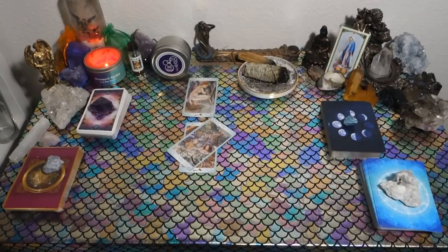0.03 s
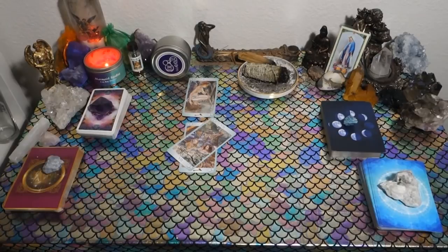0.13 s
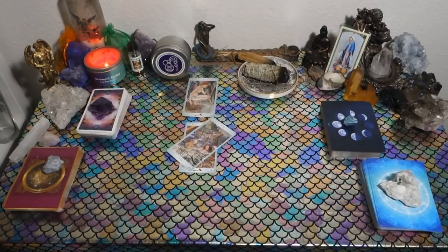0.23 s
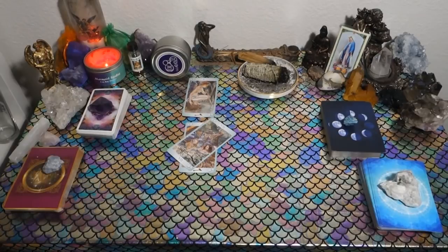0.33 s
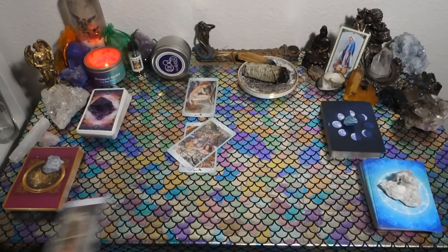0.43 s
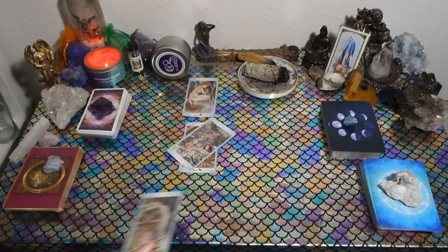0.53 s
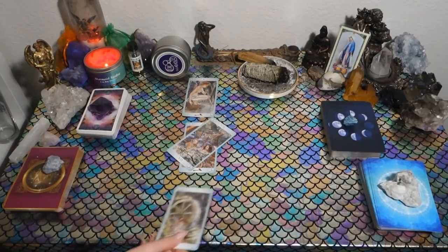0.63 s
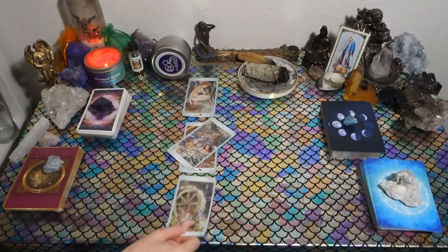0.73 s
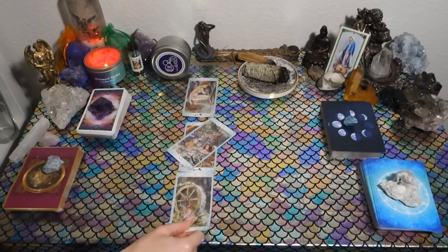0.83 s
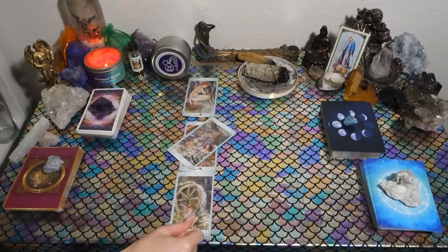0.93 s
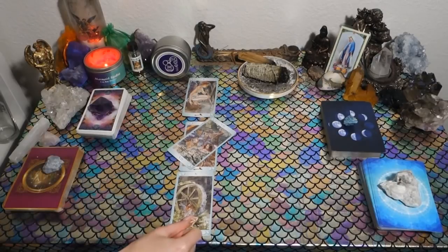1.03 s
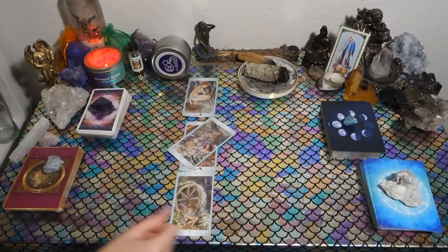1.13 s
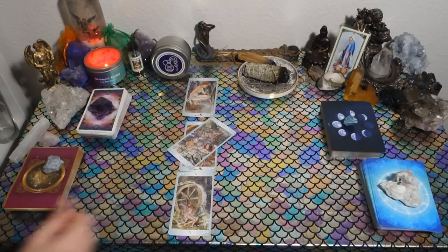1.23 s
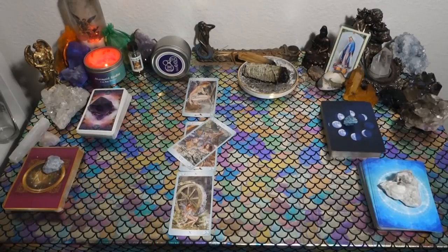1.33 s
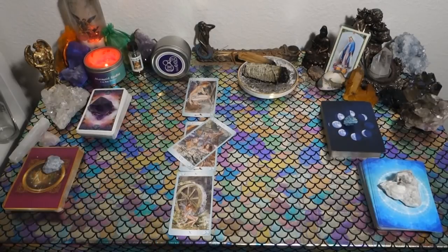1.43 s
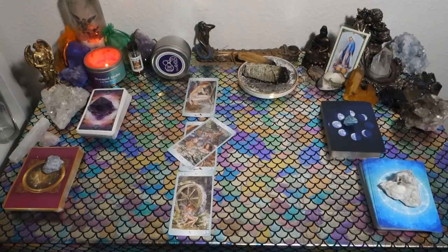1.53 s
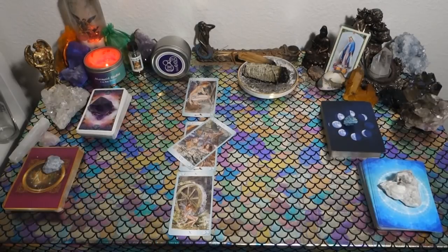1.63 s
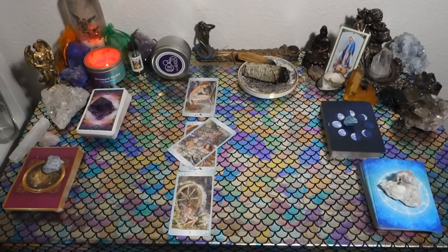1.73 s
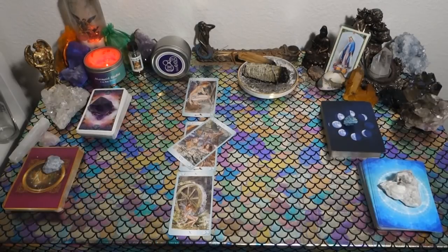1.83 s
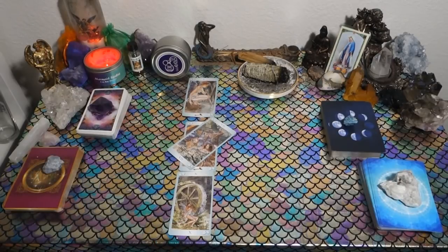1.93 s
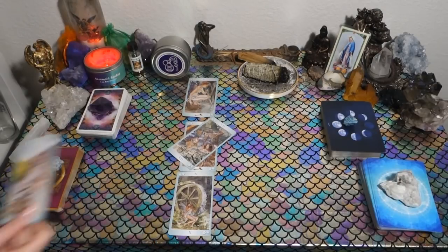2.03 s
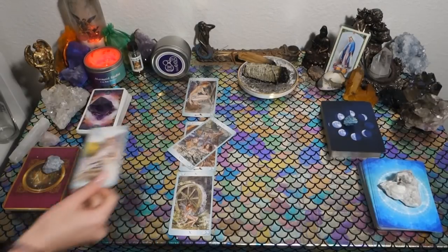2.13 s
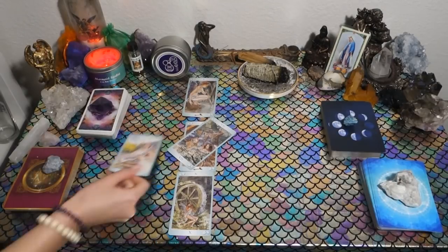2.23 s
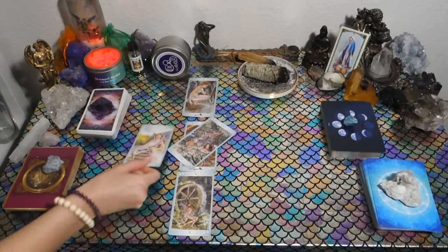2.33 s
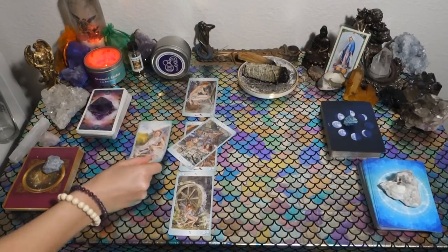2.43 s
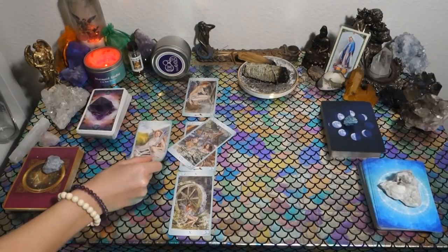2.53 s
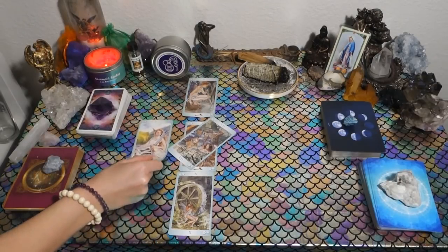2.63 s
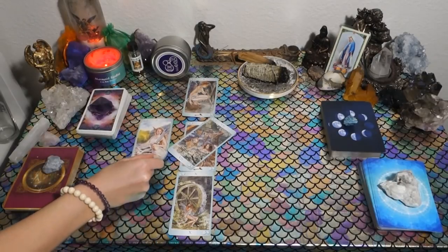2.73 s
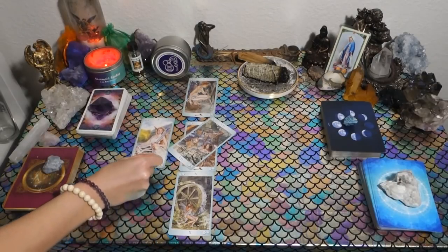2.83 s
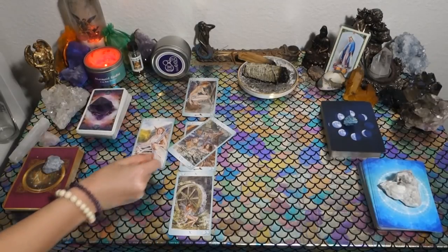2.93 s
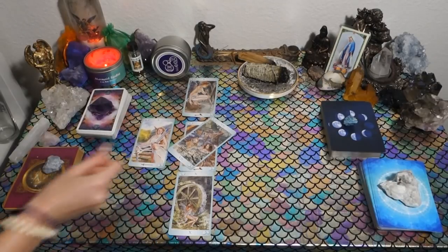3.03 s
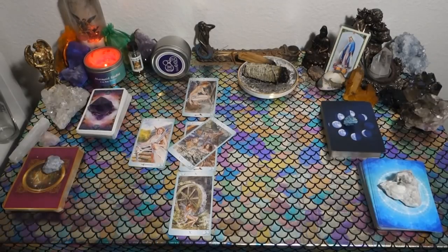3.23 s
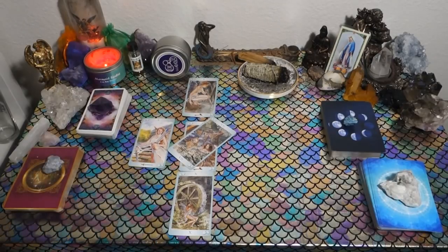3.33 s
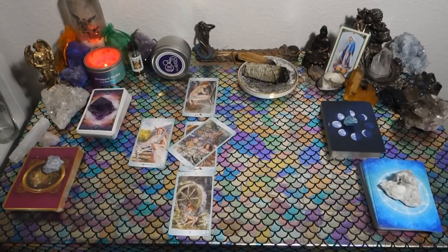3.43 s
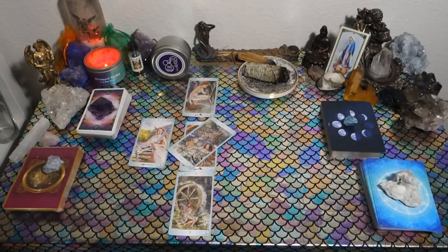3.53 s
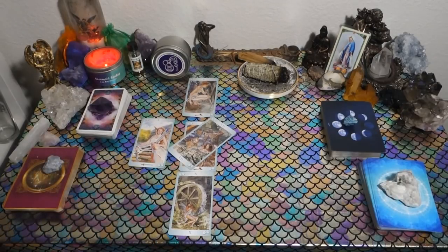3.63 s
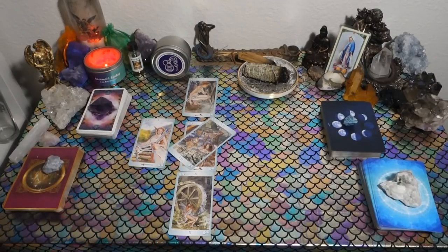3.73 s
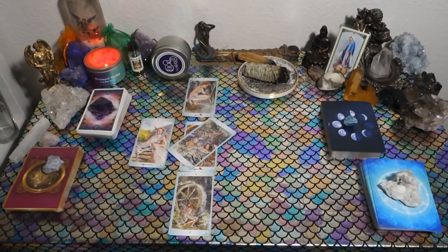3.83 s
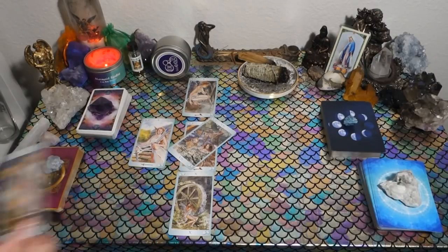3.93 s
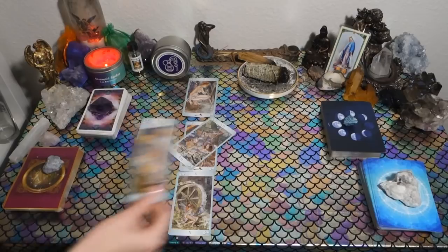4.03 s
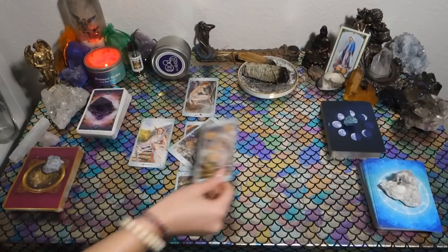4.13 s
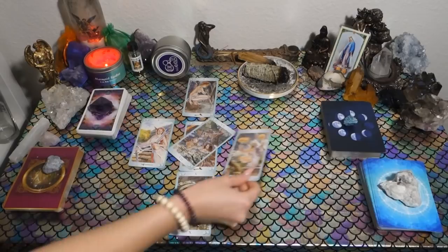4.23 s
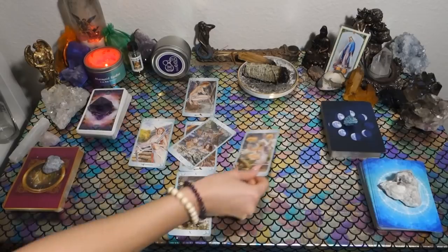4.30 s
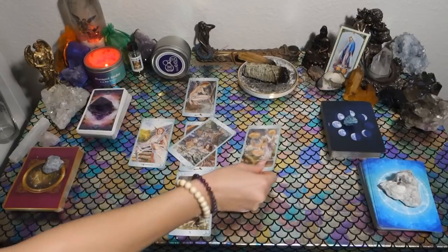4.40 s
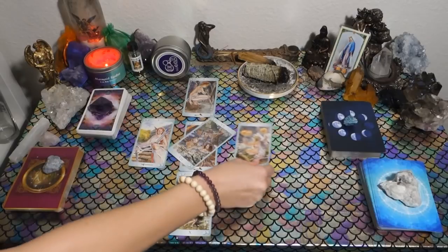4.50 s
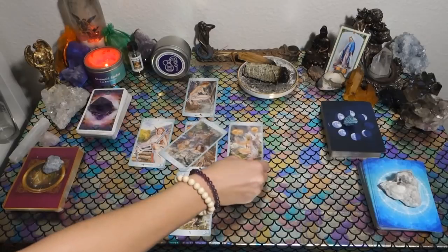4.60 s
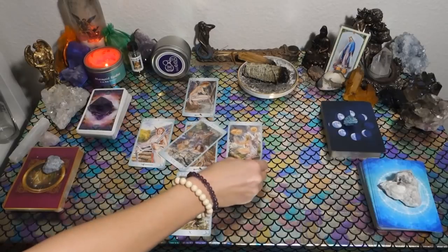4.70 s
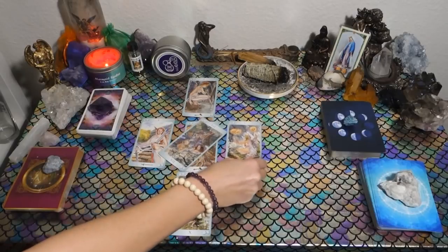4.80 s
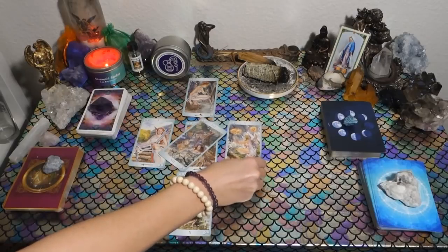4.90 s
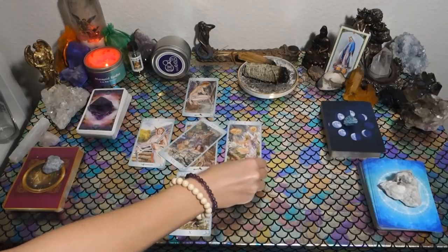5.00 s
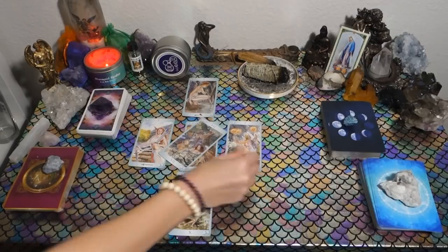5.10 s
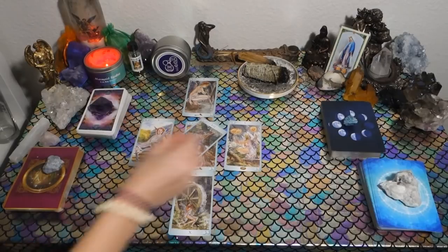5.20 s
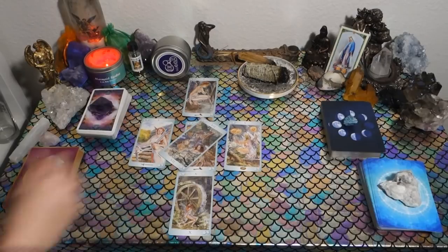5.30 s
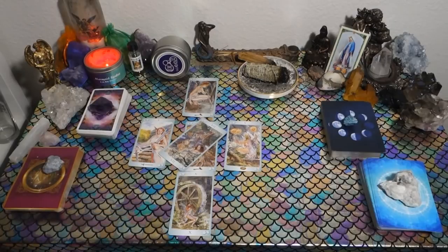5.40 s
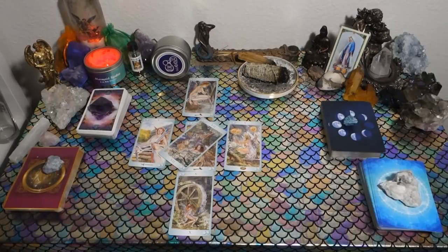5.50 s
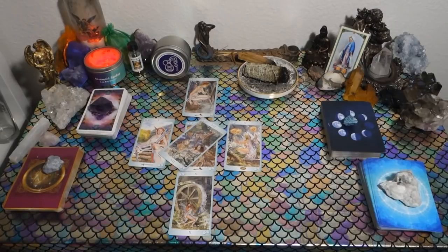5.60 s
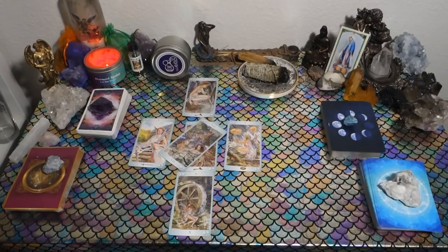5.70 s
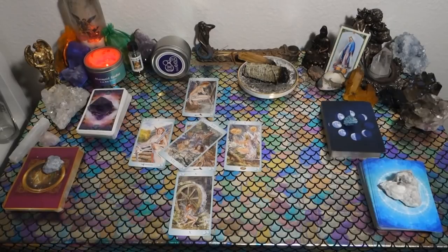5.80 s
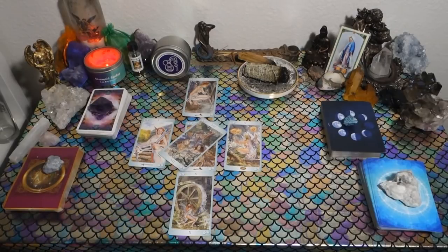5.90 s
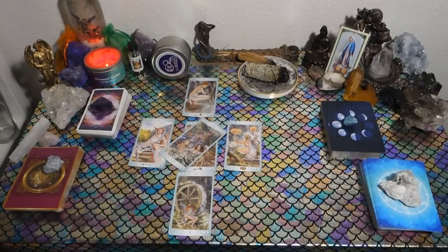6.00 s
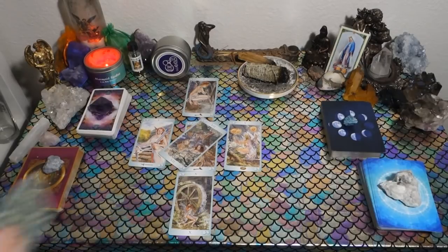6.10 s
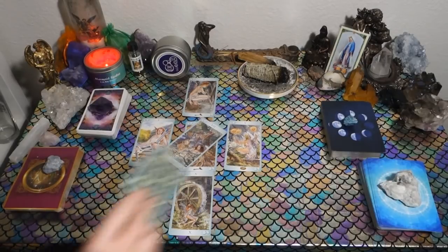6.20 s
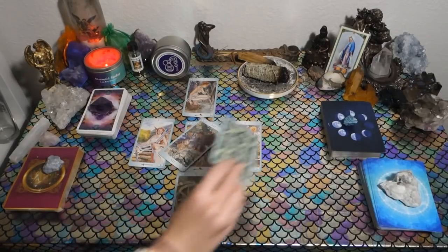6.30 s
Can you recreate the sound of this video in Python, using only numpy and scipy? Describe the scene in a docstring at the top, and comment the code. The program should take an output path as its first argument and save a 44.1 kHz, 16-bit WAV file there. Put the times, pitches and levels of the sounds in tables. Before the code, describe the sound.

A small quiet room, a stereo microphone near a cloth-covered table, with a steady low airy noise underneath. At about 0.3 s a card hisses off the deck in the hand, its edge ticking at 0.4 s; faint rubs follow, then a tiny scrape and the loudest snap at 1.0 s, with a short low thump. A faint woody thumb tap comes at 1.5 s. The second card slides out around 1.9 s, ticks and rubs between 2.3 and 2.6 s, and cracks down brightly at 2.85 s. Soft deck taps sit at 3.4 and 3.55 s. The third is drawn at 3.85 s, flicks strongly at 4.1 s, rubs near 4.5 s and slaps down at 5.0 s, a little softer and more roomy. After a light tap at 5.6 s, a fourth card slides out at 6.0 s with small flicks until about 6.3 s, without landing. Early echoes and a short tail follow each contact.

```python
"""A small room, a stereo microphone near a cloth-covered table: stiff cards are dealt from a deck in the hand.
First a low airy room noise, which lies under it all; then each card slides off the deck with a hiss of tiny
slips, its edge ticks as ringing contacts, its corner scrapes off the thumb and it snaps flat on the table.
The thumb taps the deck between cards, ringing short woody modes. Three cards are laid and a fourth is drawn.
Table and walls return a few early echoes, then a short tail of decaying noise."""
import sys
import numpy as np
from scipy import signal
from scipy.io import wavfile
from scipy.ndimage import uniform_filter1d

SR = 44100
rng = np.random.default_rng(int(sys.argv[2]) if len(sys.argv) > 2 else 0)


def bounce(signal):
    """Save signal as a 16-bit WAV file at the path given by the first command-line argument."""
    frames = np.transpose(np.atleast_2d(signal))
    limited = np.clip(frames, -1, 1)
    pcm = np.round(limited * 32767).astype(np.int16)
    wavfile.write(sys.argv[1], SR, pcm)


def how_loud(loudness_db):
    """Turn decibels into a plain amplitude multiplier (0 dB gives 1, 20 dB gives 10)."""
    steps = np.asarray(loudness_db, float) / 20
    return 10 ** steps


N = 280035


def rms_one(x):
    """Scale to unit rms."""
    return x / np.sqrt(np.mean(x ** 2) + 1e-20)


def at_hz(points, hz):
    """Read a table on a log-frequency axis."""
    table_hz, values = np.transpose(points)
    return np.interp(np.log(hz), np.log(table_hz), values)


def cut(x, hz, kind):
    """Second-order Butterworth filter."""
    return signal.sosfilt(signal.butter(2, hz, kind, fs=SR, output="sos"), x)


def resonance(hz, width_hz):
    """Coefficients of a resonance with gain 1 on top."""
    r = np.exp(-np.pi * width_hz / SR)
    return (1 - r * r) / 2 * np.array([1, 0, -1]), [1, -2 * r * np.cos(2 * np.pi * hz / SR), r * r]


def card_resonance(hz, width):
    """A card's resonance; its width is relative to the pitch and held between 0.2 and 3."""
    return resonance(hz, np.clip(width, 0.2, 3) * hz)


def twice(x, hz, width):
    """The card resonance passed twice, for steep flanks."""
    shape = card_resonance(hz, width)
    return signal.lfilter(*shape, signal.lfilter(*shape, x))


def ring(at, heights, modes):
    """Clicks at given samples strike every decaying mode; one row of heights per mode."""
    out = np.zeros(N)
    for (hz, db, t60), height in zip(modes, heights):
        train = np.full(N, 1e-18)      # a trace of offset keeps the filter out of denormals
        np.add.at(train, at, height * how_loud(db))
        r = how_loud(-60 / (t60 * SR))
        w = 2 * np.pi * hz / SR
        out += signal.lfilter([0, np.sin(w)], [1, -2 * r * np.cos(w), r * r], train)
    return out


def spread(mid, side, alike):
    """Left and right from two independent noises, with a given left-right likeness."""
    return np.sqrt(1 + alike) * mid + np.sqrt(1 - alike) * side * [[1], [-1]]


def stereo_bands(size, likeness):
    """Half-octave bands of stereo noise, as (centre Hz, band)."""
    edges = 25 * 2 ** np.arange(0, 9.7, 1 / 2)
    white = rng.standard_normal((2, 2, size))
    for k, (low, high) in enumerate(zip(edges, edges[1:])):
        # neighbouring bands take turns at two independent noises
        mid, side = cut(white[k % 2], [low, high], "band")
        hz = np.sqrt(low * high)
        yield hz, spread(mid, side, at_hz(likeness, hz))


# Card edges ticking and flicking close by, with the table's echo of the first tick as the second row.
# Each row: start in seconds, level in dB, card ring in Hz, room share in dB re level before a common gain,
# ring width relative to pitch.
EDGE_TICKS = [(0.409, -20.5, 1920, -8.5, 2.07), (0.417, -28, 3060, -17, 2.8),
              (0.5384, -35.5, 2410, -8, 2.1), (0.7206, -35, 1990, -9.5, 1.5),
              (0.7624, -39.5, 2450, -7, 1.1), (0.9178, -39, 5370, -12, 1.1), (1.8687, -24.5, 2820, -6, 3),
              (1.9284, -25.5, 1670, -11, 2.4), (2.2825, -25, 2040, -17, 0.52),
              (2.419, -21.5, 3040, -13.5, 1.8), (2.4232, -19, 2040, -12.5, 0.97),
              (2.5284, -36, 4500, -8, 2.2), (2.5477, -28, 4370, -10, 1), (2.558, -35, 5000, -12, 1.6),
              (3.8434, -30, 6750, 5.5, 1.2), (3.9478, -28, 1640, -10, 2.6), (4.0903, -31, 1600, -10, 2.5),
              (4.1122, -13, 1700, -13.5, 2.9), (4.113, -23, 2150, -10, 0.4), (4.1546, -31, 3380, -20, 2.3),
              (4.1685, -25, 3280, -12, 1.2), (4.2373, -33, 8950, -5, 0.96), (4.4208, -34.5, 2570, -9, 0.65),
              (4.5772, -23.5, 2700, -22, 0.36), (6.1682, -26.5, 2540, -10.5, 1.5),
              (6.2587, -26.5, 11000, -9, 1.2), (6.2988, -22, 2570, -11, 0.94)]
# A bent card snaps flat on the table, the later ones in two contacts. Each row: start in seconds, level in dB,
# card ring in Hz, crack in dB re ring peak, room share in dB re level before a common gain,
# ring width relative to pitch.
CARD_SLAPS = [(0.9976, 0, 2810, 7.5, -17.5, 2.7), (2.854, -3, 2040, 17, -21, 2),
              (2.8544, -3.5, 2190, 3.5, -7.5, 3.3), (4.9937, -8.5, 5260, -15, -22, 1.5),
              (4.996, -4, 3840, 2, -1.5, 1.68)]


def card_contacts():
    """A sharp, slightly rough contact rings the card and cracks on top; gives direct sound and room feed."""
    direct, feed = np.zeros(N), np.zeros(N)
    ms = np.arange(300) * 1000 / SR
    sharp = 1.0 * (ms == 0)
    # the crack of a tick lies 28 dB below its ring
    ticks = [(s, db, hz, -28, room_db, width) for s, db, hz, room_db, width in EDGE_TICKS]
    for s, db, hz, crack_db, room_db, width in ticks + list(CARD_SLAPS):
        roughness = 0.4 * rng.standard_normal(len(ms)) * np.exp(-ms / 0.73)
        contact = np.array([sharp, sharp + roughness])
        body = twice(contact, hz, width)
        crack = cut(contact, 5800, "high")
        body = body / np.abs(body[0]).max()
        crack = crack / np.abs(crack[0]).max()
        smooth, rough = body + how_loud(crack_db) * crack
        at = round(s * SR)
        direct[at:at + len(ms)] += how_loud(db) * rough / np.abs(rough).max()
        feed[at:at + len(ms)] += how_loud(db + room_db) * smooth
    return direct, feed


# The cloth-covered table under the cards. Each row: mode in Hz, relative level in dB, t60 in seconds.
TABLE_MODES = [(93.5, -21, 0.12), (150, -2, 0.077), (216, -3.5, 0.073), (300, 5, 0.031), (408, -0.5, 0.025),
               (565.6, -3.5, 0.05), (716, -0.5, 0.017), (923, 5.5, 0.011), (1262, 7.5, 0.011),
               (1724, 4, 0.015)]


def push_table(s, db, thump_hz, focus_db):
    """A soft push rings the table; modes near the thump pitch answer most, neighbours in opposite sense."""
    octaves = np.log2(np.array(TABLE_MODES)[:, :1] / thump_hz)
    scatter_db = 2 * rng.standard_normal((len(s), len(TABLE_MODES))).T
    # focus_db is the loss of a mode one octave from the thump pitch
    heights = how_loud(db - focus_db * octaves ** 2 + scatter_db)
    heights = heights * (-1) ** np.arange(len(TABLE_MODES))[:, None]
    return cut(ring((s * SR).astype(int), heights, TABLE_MODES), 1660, "low")


# Knuckles and flat cards pushing softly into the table. Each row: start in seconds, level in dB, thump in Hz.
TABLE_BUMPS = [(0.34, -38.5, 420), (.726, -33, 505), (.745, -54, 536), (0.996, -22.5, 150),
               (0.997, -18, 510), (0.996, -23, 860), (0.996, -27, 1740), (1.932, -36, 560),
               (1.949, -40, 260), (2.319, -40, 150), (2.854, -31, 150), (2.854, -26.5, 487),
               (2.854, -24, 1130), (3.893, -38.5, 550), (4.995, -26, 328), (4.996, -21, 590),
               (4.995, -23.5, 1600)]


def table_thumps():
    """The table answers every row of ticks faintly, and the soft bumps with more focused pitches."""
    s, tick_db = np.array(EDGE_TICKS)[:, :2].T
    under_ticks = push_table(s, tick_db - 21, 905, focus_db=7.5)
    return under_ticks + push_table(*np.transpose(TABLE_BUMPS), focus_db=18)


# The corner scrapes off the thumb just before each slap. Each row: start in seconds, end in seconds,
# last level in dB, ring in Hz, rise in dB.
CORNER_SLIPS = [(0.988, 0.9968, -14, 4330, 30), (2.841, 2.851, -25, 2860, 20),
                (4.987, 4.9928, -31, 3200, 17)]


def corner_slips():
    """A scrape of resonant noise that swells until the card lets go."""
    out = np.zeros(N)
    for start, end, db, hz, rise_db in CORNER_SLIPS:
        first, last = round(start * SR), round(end * SR)
        scrape = twice(rng.standard_normal(1000), hz, 3)[:last - first]
        swell_db = db - rise_db * np.linspace(1, 0, last - first)
        out[first:last] = rms_one(scrape) * how_loud(swell_db)
    return out


# A card is drawn off the deck in the hand. Each row: card leaves in seconds, time at full speed in seconds,
# card ring in dB, hiss in dB, both before the common slide level.
CARD_DRAWS = [(0.322, 0.11, -37, -35.5), (1.907, 0.14, -36, -36), (3.867, 0.11, -34.5, -36.5),
              (6.046, 0.12, -37, -35)]
# The course of every draw, one row each at start, full speed, leaving and end. Each row: ring in dB re the
# draw's ring, ring in Hz, hiss in dB re the draw's hiss, rumble in dB re the draw's ring,
# ring width relative to pitch.
DRAW_COURSE = [(-26, 4300, -25, -36, 2.1), (-11, 1000, -2.5, -16.5, 3), (1, 2140, 2.5, -10.5, 3.5),
               (-38, 3500, -31, -23, 1.3)]
# A card rubs on fingers or cloth. Each row: peak in seconds, swell in seconds, fade in seconds,
# peak level in dB before the common slide level, card ring in Hz, hiss in dB re level.
CARD_RUBS = [(0.68, 0.04, 0.048, -52.5, 2800, 9), (0.78, 0.05, 0.14, -50, 2950, 6),
             (0.985, 0.096, 0.0064, -42, 3200, -1), (2.33, 0.044, 0.17, -41, 2100, 0.5),
             (2.488, 0.015, 0.015, -30, 4250, -12), (2.555, 0.019, 0.064, -42.5, 4500, 2),
             (4.14, 0.037, 0.099, -42.5, 2150, 5.5), (4.45, 0.04, 0.019, -42.5, 2680, 5),
             (4.56, 0.11, 0.051, -34, 2660, -3.5), (4.63, 0.04, 0.035, -45.5, 2550, 9.5),
             (6.263, 0.0085, 0.02, -46, 3300, 14), (6.31, 0.015, 0.051, -35, 2830, -3)]


def strokes():
    """Corner points of every slide: s, ring dB, ring Hz, hiss dB, rumble dB, ring width."""
    speed_up_s, die_away_s = 0.095, 0.039
    ring_db, hz, hiss_db, rumble_db, width = np.transpose(DRAW_COURSE)
    for s, hold, db, top_db in CARD_DRAWS:
        times = s + np.array([-hold - speed_up_s, -hold, 0, die_away_s])
        yield times, db + ring_db, hz, top_db + hiss_db, db + rumble_db, width
    same = np.ones(3)
    for s, swell, fade, db, card_hz, hiss_db in CARD_RUBS:
        times = s + np.array([-swell, 0, fade])
        level = db + np.array([-16.5, 0, -16.5])
        yield times, level, card_hz * same, level + hiss_db, level - 13, 0.72 * same


def card_slides():
    """Dense tiny slips ring the moving card resonance, hiss above it and rumble in the table."""
    time, out = np.arange(N) / SR, np.zeros(N)
    burst_db = 4.5 * np.minimum(rng.exponential(1, (3, N)), 5)
    grit = rng.standard_normal((3, N)) * how_loud(burst_db)
    hiss = rms_one(cut(grit[1], 6100, "high"))
    rumble = rms_one(cut(grit[2], [300, 900], "band"))
    for s, *columns in strokes():
        span = slice(int(s[0] * SR), int(s[-1] * SR))
        db, hz, hiss_db, rumble_db, width = (np.interp(time[span], s, c) for c in columns)
        body, state = grit[0, span].copy(), np.zeros((2, 2))
        for i in range(0, len(body), 128):      # the resonance moves in short steps
            shape = card_resonance(hz[i], width[i])
            for k in (0, 1):      # passed twice, for steep flanks
                body[i:i + 128], state[k] = signal.lfilter(*shape, body[i:i + 128], zi=state[k])
        body = body / np.sqrt(uniform_filter1d(body ** 2, size=2048))      # even running level
        slide = how_loud(db) * body + how_loud(hiss_db) * hiss[span] + how_loud(rumble_db) * rumble[span]
        out[span] += signal.windows.tukey(len(body), 0.1) * slide
    return out


# The thumb on the deck. Each row: start in seconds, level in dB, rustle in dB re level before its high-pass.
THUMB_TAPS = [(1.501, -34.5, -3), (3.384, -36, -3), (3.547, -44, -0.5), (5.571, -39.5, 3)]
# The deck in the hand. Each row: mode in Hz, relative level in dB, t60 in seconds.
DECK_MODES = [(954, 8.5, 0.05), (1004, 4, 0.033), (1410, -11, 0.0054), (1810, 15.5, 0.0094),
              (2150, 5, 0.0042), (2500, 8, 0.01)]


def deck_taps():
    """The deck answers each tap with a few short woody modes and a brief bright rustle."""
    s, db, rustle_db = np.transpose(THUMB_TAPS)
    at = (s * SR).astype(int)
    scatter_db = rng.standard_normal((len(s), len(DECK_MODES))).T
    knock = ring(at, how_loud(db - 8.0 + scatter_db), DECK_MODES)
    touch = np.full(N, 1e-18)
    touch[at] = how_loud(db + rustle_db)
    fading = signal.lfilter([1], [1, -np.exp(-1 / (0.0044 * SR))], touch)
    return knock + cut(fading * rng.standard_normal(N), 1700, "high")


# Table top and near walls. Each row: delay in seconds, left level in dB, right level in dB.
EARLY_ECHOES = [(.0017, -3, -3), (.0060, -12, -11), (.0077, -7, -8), (.0105, -11, -11)]


def early_echoes(x):
    """Table top and near walls return a few sharp copies, two samples later on the right."""
    out = np.zeros((2, N))
    for delay, left_db, right_db in EARLY_ECHOES:
        lag = round(delay * SR)
        out[0, lag:] += how_loud(left_db) * x[0, :-lag]
        out[1, lag + 2:] += how_loud(right_db) * x[1, :-lag - 2]
    return out


# How long the small room rings. Each row: frequency in Hz, t60 in seconds.
ROOM_T60 = [(100, 0.21), (260, 0.46), (700, 0.42), (1840, 0.54), (3000, 0.42), (4850, 0.39), (7500, 0.32),
            (12800, 0.25)]
# How alike the tail is at both microphone sides. Each row: frequency in Hz, left-right likeness (1 is equal).
ROOM_LIKENESS = [(100, 1), (300, 0.92), (700, 0.82), (1500, 0.73), (4000, 0.022), (14000, 0.069)]


def room_tail(x):
    """Diffuse reverberation: noise that builds up in milliseconds and dies band by band."""
    t = np.arange(SR // 2 + SR // 4) / SR
    bands = stereo_bands(len(t), ROOM_LIKENESS)
    answer = sum(band * how_loud(-60 * t / at_hz(ROOM_T60, hz)) for hz, band in bands)
    answer = answer * (1 - np.exp(-(t / 0.0049) ** 2))
    answer = answer / np.sqrt(np.sum(answer ** 2) / 2)
    return signal.fftconvolve(x[None], answer, axes=1)[:, :N]


# The air of the room with nobody moving. Each row: frequency in Hz, relative density in dB per Hz.
AIR_SPECTRUM = [(25, -36), (45, -3.5), (100, -6), (250, -10), (400, -26), (800, -15), (1400, -18),
                (2800, -20), (5000, -23), (9000, -22.5), (13000, -32), (16000, -16)]
# Humps in that air. Each row: centre in Hz, width in Hz, level in dB re the rest of the air.
AIR_HUMPS = [(137.6, 43, -5.5), (274.6, 60, -4), (652.5, 32, -12.5), (937, 96, -5), (2102, 110, -10)]
# How alike the air is at both microphone sides. Each row: frequency in Hz, left-right likeness (1 is equal).
AIR_ALIKE = [(60, 0.97), (180, 0.84), (550, 0.3), (1650, 0), (4970, 0.0), (15000, 0.078)]


def room_air():
    """Steady stereo noise shaped band by band, with a few resonant humps."""
    bands = stereo_bands(N, AIR_ALIKE)
    out = rms_one(sum(band * how_loud(at_hz(AIR_SPECTRUM, hz)) for hz, band in bands))
    for hz, width_hz, db in AIR_HUMPS:
        mid, side = signal.lfilter(*resonance(hz, width_hz), rng.standard_normal((2, N)))
        out = out + how_loud(db) * rms_one(spread(mid, side, at_hz(AIR_ALIKE, hz)))
    return how_loud(-50.5) * out


def scene():
    """Cards, deck and table close by, their echoes and tail, and the room air."""
    contact, contact_feed = card_contacts()
    thump, tap, slide = table_thumps(), deck_taps(), card_slides()
    close = contact + thump + corner_slips() + tap + how_loud(-11.5) * slide
    near = np.tile(close, (2, 1))
    feed = how_loud(12.5) * (contact_feed + how_loud(-8) * thump) + how_loud(3.0) * tap + how_loud(-8.5) * slide
    cards = near + early_echoes(near) + room_tail(feed)
    # the microphone body shades the treble on the left
    treble = cut(cards, 1490, "high")
    treble_db = np.array([[-2], [2]])      # left, right
    cards = cards + treble * (how_loud(treble_db) - 1)
    return cut(cards, 75, "high") + room_air()


def top_cut(x):
    """Nothing passes above the cut-off."""
    return signal.sosfilt(signal.butter(12, 17140, fs=SR, output="sos"), x)


def record(dry):
    """The top is cut steeply, 60 dB down from 17 kHz."""
    top = signal.cheby2(10, 60, 17000, fs=SR, output="sos")
    mix = signal.sosfilt(top, dry)
    return top_cut(mix)


dry = scene()
out = record(dry)
bounce(out)
```